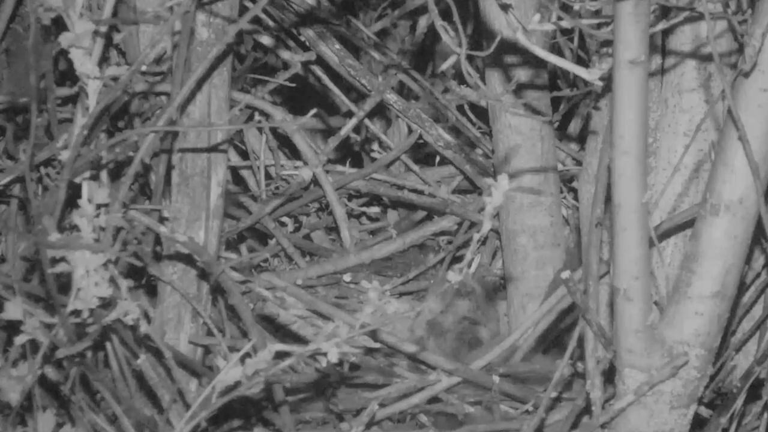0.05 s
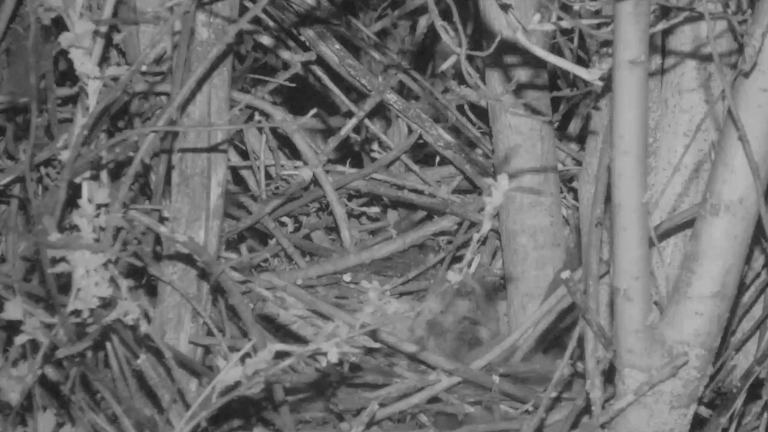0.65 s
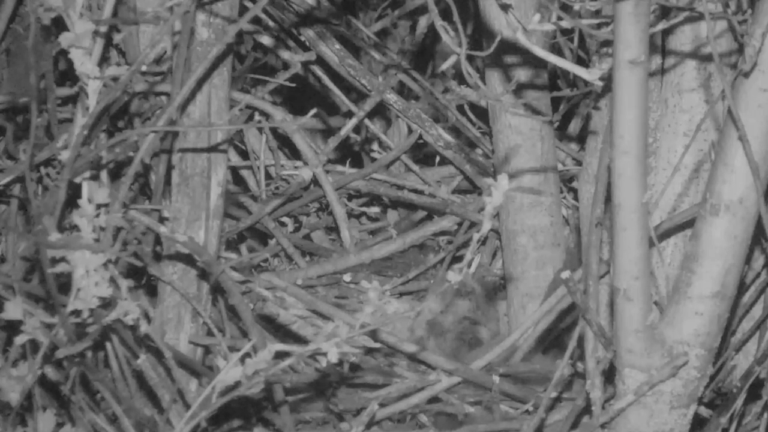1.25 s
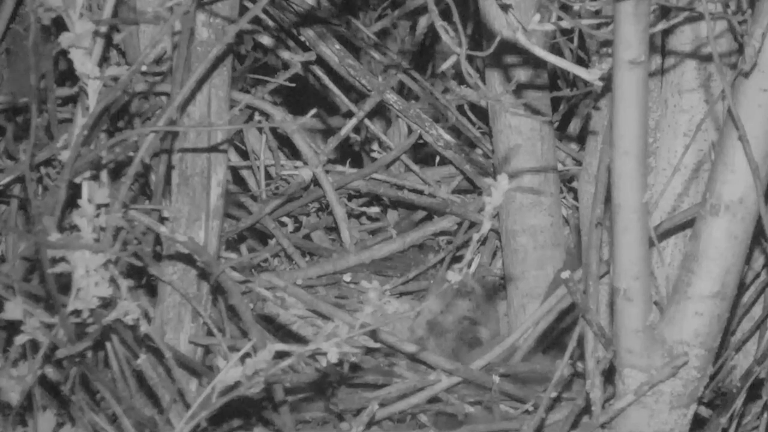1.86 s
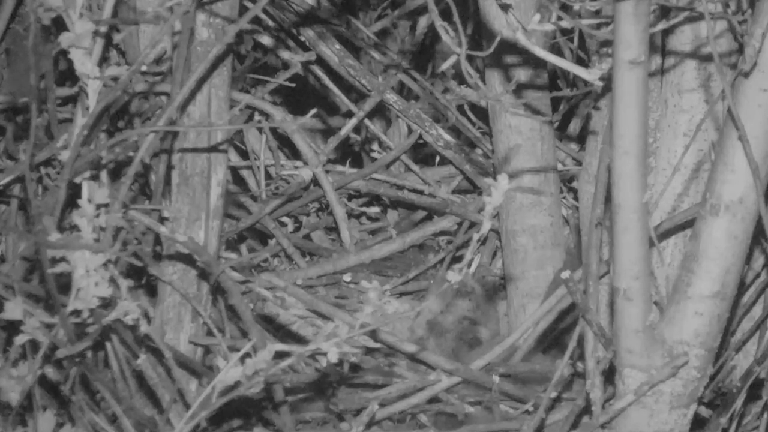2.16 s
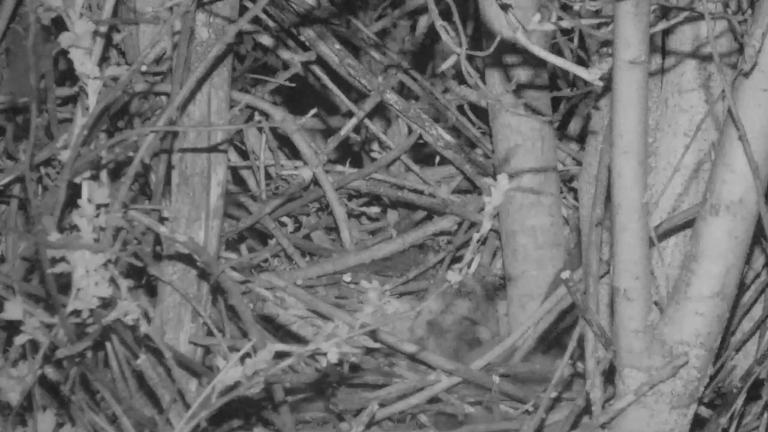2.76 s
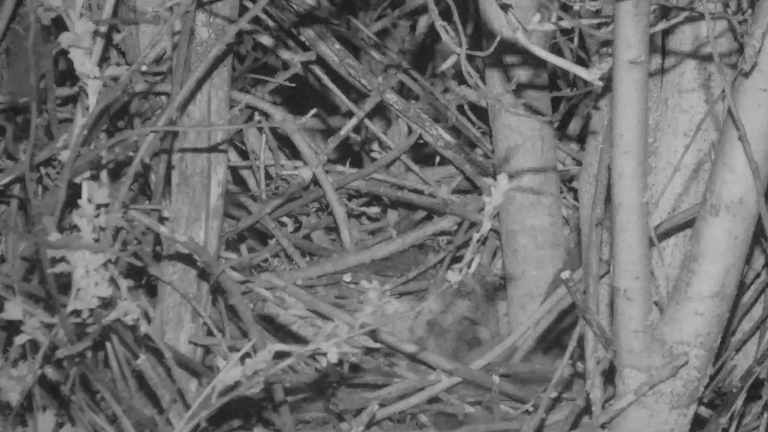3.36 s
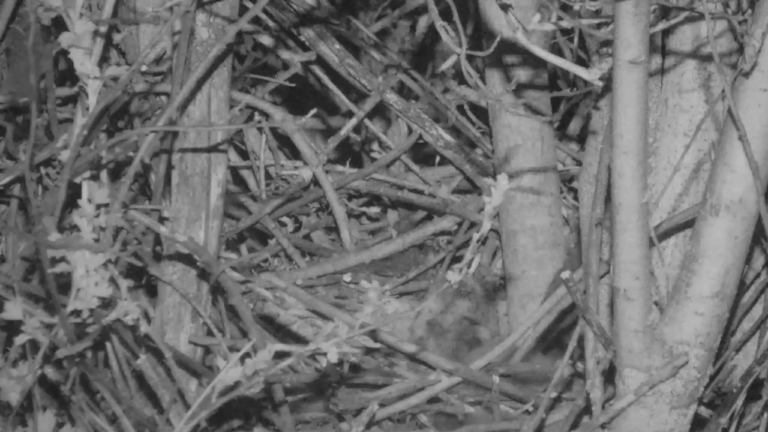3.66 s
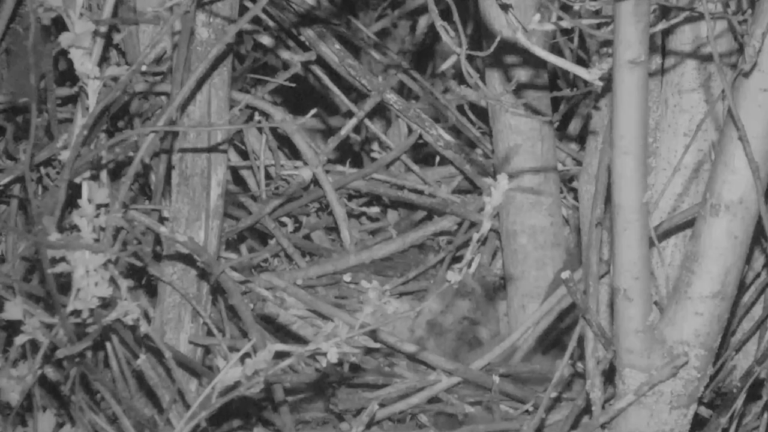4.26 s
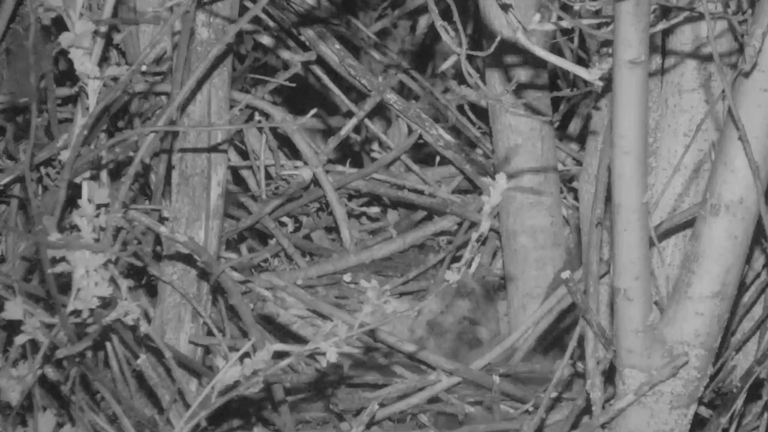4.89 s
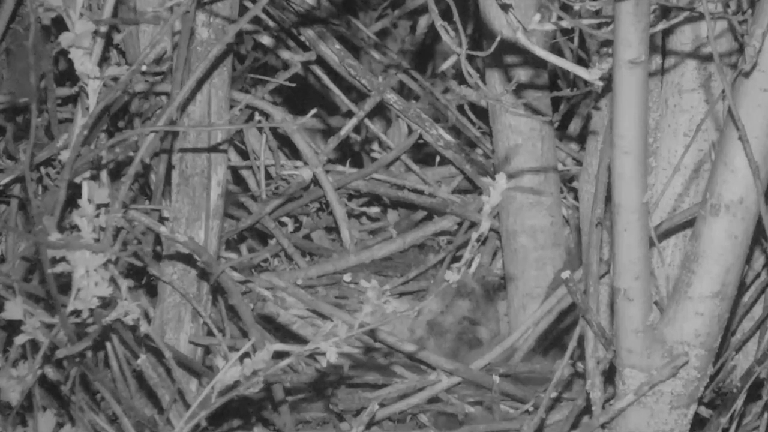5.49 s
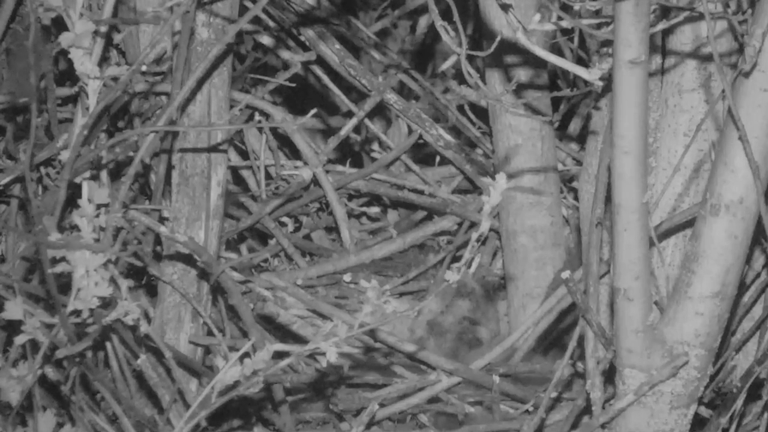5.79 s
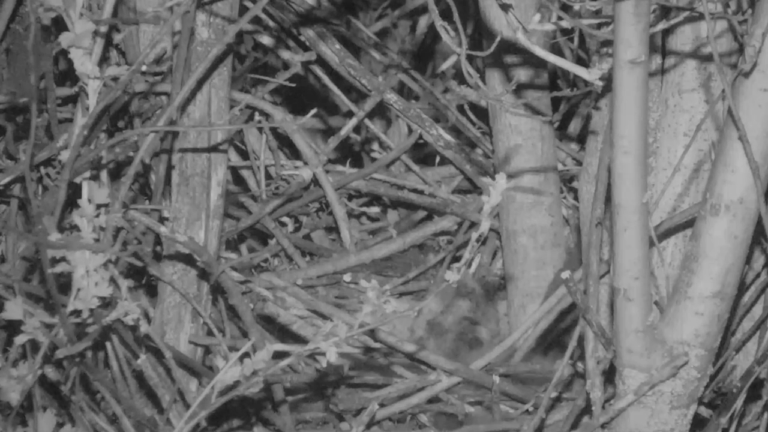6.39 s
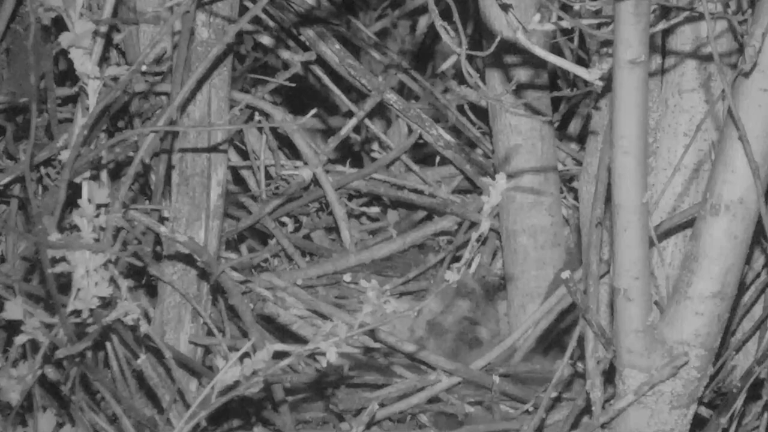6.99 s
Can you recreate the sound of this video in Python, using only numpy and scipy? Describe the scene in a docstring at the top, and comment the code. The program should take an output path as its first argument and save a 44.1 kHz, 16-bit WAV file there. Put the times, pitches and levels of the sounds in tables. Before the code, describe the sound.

An owl squeals in thin, wavering wails at its nest, with rustling, snapping twigs and soft thumps over faint hiss and hum.

```python
"""Owl at the nest by night

An owl squeals in thin, wavering wails, a harmonic tone that sometimes breaks into a low cluck.
Feathers and feet rustle in the sticks by friction, twigs and the owl's bill snap sharply, and the nest
thumps under the bird's weight. Nearby trunks reflect the calls and snaps. The microphone beside
the nest favours 2-4 kHz and carries a faint hiss and electrical hum."""
import sys
import numpy as np
from scipy import signal
from scipy.fft import rfft, irfft
from scipy.io import wavfile

SR = 44100
rng = np.random.default_rng(int(sys.argv[2]) if len(sys.argv) > 2 else 0)


def waveform_to_disk(signal):
    """Save audio, clipped to [-1, 1], as 16-bit WAV at the path in sys.argv[1]."""
    frames = np.transpose(np.atleast_2d(signal))
    scaled = np.clip(frames, -1, 1) * 32767
    samples = np.round(scaled).astype(np.int16)
    wavfile.write(sys.argv[1], SR, samples)


N = 314874
TIME = np.arange(N) / SR
CUTOFF_HZ = 14350

# crests and troughs of pitch, one table per squeal: t/s, f/Hz, effort/dB
SQUEAL_TURNS = [
    [(0.0, 1550, -31), (0.041, 1567, -29), (0.073, 1510, -35.5), (0.128, 1607, -27.5), (0.249, 1507, -34),
     (0.294, 1569, -28.5), (0.331, 1300, -39), (0.378, 1614, -24.5), (0.402, 1425, -36), (0.462, 1693, -24),
     (0.495, 1573, -26.5), (0.524, 1771, -28), (0.556, 1690, -24.5)],
    [(0.798, 1548, -27), (0.899, 1492, -30.5), (0.968, 1574, -29.5), (1.012, 1496, -28.5),
     (1.059, 1573, -28.5), (1.129, 1563, -30), (1.162, 1602, -28.5), (1.22, 1482, -32), (1.264, 1560, -28),
     (1.296, 1610, -32), (1.331, 1855, -27), (1.38, 1364, -23)],
    [(1.662, 2024, -33), (1.682, 2145, -30), (1.744, 2026, -29), (1.757, 1766, -28), (1.778, 2052, -21.5),
     (1.829, 1494, -24), (1.844, 1628, -25), (1.859, 2212, -14), (1.871, 1740, -25), (1.884, 2006, -18),
     (1.903, 1588, -25), (1.922, 1735, -21), (1.94, 1477, -25), (1.972, 1623, -22.5), (1.981, 2114, -20.5),
     (2.027, 1627, -22), (2.074, 2166, -21), (2.087, 1930, -25.5), (2.109, 1985, -24), (2.136, 2428, -24.5),
     (2.183, 1425, -22), (2.201, 2464, -20), (2.227, 2655, -18.5), (2.261, 1657, -22.5), (2.271, 1834, -22),
     (2.288, 1640, -30)],
    [(2.52, 1993, -24.5), (2.536, 2083, -19.5), (2.601, 1848, -25.5), (2.652, 1631, -29),
     (2.675, 1680, -26), (2.726, 1601, -27.5), (2.812, 1921, -28), (2.827, 1739, -23), (2.848, 1788, -26),
     (2.864, 1555, -24.5), (2.881, 1756, -28), (2.895, 1620, -28), (2.927, 1680, -29.5)],
    [(2.96, 1626, -28.5), (2.975, 2060, -24.5), (3.02, 1604, -24.5), (3.039, 1990, -24),
     (3.061, 1644, -23.5), (3.081, 1643, -30), (3.117, 2052, -21), (3.154, 1750, -22.5)],
    [(3.423, 1962, -25.5), (3.445, 2138, -27.5), (3.532, 1965, -28), (3.552, 1926, -25), (3.571, 1643, -30),
     (3.645, 1677, -27.5), (3.665, 1620, -33), (3.788, 1669, -29), (3.798, 1582, -27.5), (3.858, 1599, -36),
     (3.88, 1751, -21), (3.891, 1600, -28.5), (3.944, 1632, -29.5), (3.97, 1810, -26.5), (3.991, 1598, -24),
     (4.008, 1580, -27.5), (4.032, 1903, -24.5), (4.074, 1236, -27.5)],
    [(4.093, 1765, -30), (4.101, 1743, -26.5), (4.119, 1820, -46)],
    [(4.335, 1893, -28.5), (4.361, 2190, -28), (4.389, 2115, -32.5), (4.418, 2187, -27.5),
     (4.459, 2070, -32), (4.499, 1640, -30), (4.514, 1715, -27.5), (4.536, 1603, -35), (4.581, 1792, -29.5),
     (4.597, 1586, -36), (4.608, 1680, -33), (4.653, 1662, -35), (4.693, 1658, -35.5)],
    [(4.744, 1787, -40), (4.751, 1882, -35), (4.794, 1563, -34), (4.818, 1746, -37), (4.832, 1590, -50),
     (4.846, 1705, -34), (4.871, 1660, -50)],
    [(4.906, 1654, -43), (4.925, 1730, -38.5), (4.934, 1640, -54)],
]
# timbre of each squeal: octave/dB, roughness (0-1) at start, at end, third partial/dB, higher ones/dB
SQUEAL_TIMBRES = [(4.5, 0.07, 0.55, -12, 1), (-0.5, 0.04, 0.4, -17.5, -1), (-0.5, 0.28, .55, -6.5, -3),
                  (-2, 0.14, 0.79, -6, -13), (2, 0.58, 0.028, -4.5, -8.5), (-3.5, 0.13, 0.36, -1, -9),
                  (-1, 0.4, 0.22, -4, -9), (0, 0, 0.72, 0.5, -8), (2, 0.6, .3, 0, -11),
                  (4.5, .3, .3, -8, -9)]
# weighting of the fundamental and the octave: f/Hz, gain/dB
VOICE_RESPONSE = [(1250, -7), (1530, -9.5), (1650, -3), (1800, -0.5), (2150, -1), (2700, 1), (2850, -6),
                  (3000, 0.5), (3120, -1.5), (3300, -2), (3600, 5), (4100, 0), (4400, -8.5), (4850, -13),
                  (5100, -33), (5400, -32)]
# weighting of the higher partials, relative to those two: f/Hz, gain/dB
OVERTONE_RESPONSE = [(3700, 4), (4700, -16), (5500, -31), (6300, -31.5), (7000, -42), (7900, -36),
                     (9500, -47), (11000, -51), (13000, -59)]
# reflections from trunks: delay/s, gain/dB
TRUNK_ECHOES = [(.0031, -37), (.0074, -13), (0.0135, -22.5), (.019, -20)]
# light fidgeting between stirs: t/s, level/dB
FIDGETING = [(0, -58), (2.4, -51), (3.4, -56), (4.7, -55), (5, -72), (6.1, -52), (6.5, -73.5), (7.1, -46)]
# the bird stirs: t/s, rise/s, fall/s, stick level/dB, feather level/dB
STIRS = [(.05, 0.17, 0.067, -48, -63), (.31, 0.13, 0.069, -47, -63), (.4, 0.013, 0.091, -44.5, -58),
         (.52, 0.042, 0.3, -47, -61), (.86, 0.13, 0.097, -48.5, -61.5), (1.418, 0.077, .03, -41.5, -75),
         (1.58, 0.081, 0.12, -43, -60), (1.83, 0.03, 0.045, -30.5, -43.5), (2.07, 0.22, 0.092, -37, -50),
         (2.31, 0.05, 0.046, -36.5, -56.5), (2.647, 0.1, 0.084, -39, -51.5),
         (2.84, 0.059, 0.074, -40, -56.5), (3.16, 0.049, 0.046, -42, -77), (3.46, .05, 0.028, -39.5, -61),
         (3.78, .025, 0.024, -45, -63), (4.239, 0.063, 0.047, -39, -52), (4.44, 0.15, 0.09, -46.5, -61),
         (4.65, 0.11, 0.017, -44.5, -59.5), (5.15, 0.024, .025, -51.5, -61),
         (5.67, 0.069, 0.27, -52.5, -67), (5.83, 0.015, 0.068, -38.5, -54.5),
         (5.975, 0.043, 0.029, -40, -56.5), (6.05, 0.044, 0.037, -47, -62),
         (7.07, 0.02, 0.22, -42.5, -55.5)]
# spectrum of rubbing sticks: f/Hz, density/dB
STICK_SPECTRUM = [(200, -10.5), (600, -16), (900, -15), (1250, -11), (1600, -9.5), (2300, 1.5), (2750, 0.5),
                  (3400, 4), (3900, 1), (4500, -26.5), (5500, -21.5), (7000, -29), (10000, -58)]
# spectrum of brushing feathers: f/Hz, density/dB
FEATHER_SPECTRUM = [(3000, -5), (4500, 13), (6000, -2.5), (8500, 0.5), (11000, -6), (14300, -8.5)]
# the bird's weight shakes the nest: t/s, rise/s, fall/s, level/dB
LURCHES = [(.9, 0.036, 0.22, -44.5), (1.22, 0.065, 0.099, -40.5), (1.487, 0.033, 0.023, -31),
           (1.66, 0.19, 0.071, -33.5), (1.82, 0.2, 0.16, -44.5), (5.85, .015, 0.044, -43.5),
           (7.12, .04, .06, -57)]
# spectrum of the shaken nest: f/Hz, density/dB
THUMP_SPECTRUM = [(35, -12), (70, -2), (140, 0), (220, -5), (300, -5.5), (400, -5), (600, -20), (850, -7.5),
                  (1100, -44.5), (2000, -59)]
# spectrum of the hiss: f/Hz, density/dB
HISS_SPECTRUM = [(25, -11.5), (50, -8.5), (90, -18.5), (200, -22.5), (420, -20.5), (750, -22.5),
                 (1250, -27.5), (1600, -21.5), (2000, -23.5), (2350, -22), (2800, -18.5), (3300, -26),
                 (3900, -38.5), (6000, -43), (14300, -53.5)]
# lines of electrical hum and whine: f/Hz, relative level/dB
HUM_LINES = [(59, -61), (117.4, -61), (351, -59.5), (585.5, -55.5), (876, -62), (985, -60), (1054, -61.5),
             (1873, -56.5), (1970, -59.5), (2106, -54), (2661, -67), (2810, -54), (2955, -56.5),
             (3159.5, -49), (4213, -68)]
# spectrum of the steady rumble: f/Hz, density/dB
RUMBLE_SPECTRUM = [(20, 2), (55, -5.5), (130, -26), (1000, -50), (9000, -63)]
# sharp snaps of twigs and of the owl's bill:
# t/s, peak level/dB, burst length/s, knock/dB, tilt of the ring/(dB per octave)
SNAPS = [(0.244, -17.5, 0.0023, -24, 19), (.392, -19, 0.0025, -17, 5), (0.505, -13, 0.0026, -9, 6),
         (1.541, -6.5, 0.0017, -27, -7), (1.546, -6.5, 0.0081, -31, -3), (1.56, -18, 0.003, -16, -6),
         (1.595, -10.5, 0.0018, -7, -17), (3.412, -19.5, 0.0064, -7, 6), (3.432, -15.5, 0.007, -15, 17),
         (3.4958, -2, 0.0051, -51, 4), (3.578, -14.5, 0.0073, -24, -11), (3.649, -17, .0069, -14, -15),
         (3.762, -17.5, 0.0017, -8, -14), (3.806, -16.5, 0.0085, -24, -10), (5.8169, -12, 0.0013, -5, -2),
         (5.827, -6, .0035, -23, 7), (5.8516, -7, 0.00095, -8, -4), (5.8908, -10, 0.0014, -16, 3),
         (5.969, -25, 0.0052, -20, -2), (5.973, -16.5, 0.0046, -26, 13), (6.168, -28.5, .0025, -15, 6),
         (6.855, -15.5, 0.0052, -40, 13), (6.973, -24, 0.0084, -9, -2), (6.984, -20.5, 0.0043, -11, 13),
         (7.057, -9.5, 0.00029, -1, 26), (7.071, -23, .01, -7, -2)]
# bright ring of a snap: f/Hz, level/dB, T60/s
BRIGHT_MODES = [(2290, 4.5, 0.0051), (2420, 3, 0.0086), (2900, -1.5, 0.011), (3356, 2, 0.01),
                (3730, -0.5, 0.0052)]
# its lower knock: f/Hz, level/dB, T60/s
KNOCK_MODES = [(239, -18, 0.015), (720, -17, 0.0072), (1100, -34, 0.0012), (1590, -2.5, 0.0058)]
# ticks of bark and leaves: t/s, relative level/dB
BARK_TICKS = [(.335, -36), (.394, -34), (.951, -35), (1.953, -28), (2.108, -26), (2.328, -27), (3.497, -36),
              (3.913, -44), (5.156, -45)]
# breaks into the low register: t/s, hold/s, f/Hz, level/dB, initial pitch drop/octaves
CLUCKS = [(0.577, .004, 463.5, -28.5, 1.3), (1.441, 0.03, 480.3, -24.5, 0), (2.325, .003, 400, -46.5, 1.4),
          (3.168, 0.0037, 394, -41.5, 1.4)]
# resonances of the throat in that register: f/Hz, gain/dB
THROAT_RESPONSE = [(150, 19), (480, -1.5), (970, -10), (1450, -13.5), (1900, -12), (2400, -0.5),
                   (2900, -10), (3400, -9), (4200, -17.5), (6000, -43)]


def from_db(db):
    """Amplitude ratio: a factor of ten per 20 dB."""
    return 10 ** (np.asarray(db) / 20)


def unit_rms(x):
    """Normalisation to unit mean power."""
    return x / np.sqrt(np.mean(x ** 2) + 1e-20)


def in_time(rows, t=TIME):
    """Linear interpolation of each column at times t."""
    times, *columns = np.transpose(rows)
    return [np.interp(t, times, column) for column in columns]


def gain_at(spectrum, hz):
    """Frequency response, interpolated in decibels on a logarithmic frequency axis."""
    points, db = np.transpose(spectrum)
    return from_db(np.interp(np.log(hz + 1e-9), np.log(points), db))


def coloured(noise, spectrum):
    """Spectral shaping to unit rms, with a 12 dB per octave roll-off below the lowest point."""
    hz = np.arange(N // 2 + 1) * SR / N
    roll_off = np.minimum(hz / spectrum[0][0], 1) ** 2
    return unit_rms(irfft(rfft(noise) * gain_at(spectrum, hz) * roll_off, N))


def drift(rate_hz, size=N):
    """Random modulation: low-passed noise of unit rms."""
    lowpass = signal.butter(2, rate_hz, fs=SR, output="sos")
    return unit_rms(signal.sosfilt(lowpass, rng.standard_normal(size + SR // 10))[-size:])


def call_window(start, end, fade_s):
    """Raised-cosine gating: the samples of a call, their times and the gate."""
    at = np.flatnonzero((TIME > start - fade_s / 2) & (TIME < end + fade_s / 2))
    t = TIME[at]
    to_edge_s = np.minimum(t - t[0], t[-1] - t)
    return at, t, np.sin(np.pi / 2 * np.clip(to_edge_s / fade_s, 0, 1)) ** 2


def swell(peak_s, rise_s, fall_s):
    """Asymmetric Gaussian envelope of unit height."""
    width_s = np.where(TIME < peak_s, rise_s, fall_s)
    return np.exp(-np.minimum(((TIME - peak_s) / width_s) ** 2, 50))


def glide(turns, t, crest_breadth=1.3):
    """Frequency contour that lingers on crests and darts through troughs; both ends are in mid-glide."""
    times, hz, _ = np.transpose(sorted(turns))
    position = np.interp(t, times, np.arange(len(times)))
    leg = np.minimum(position.astype(int), len(times) - 2)
    x, step_hz = position - leg, np.diff(hz)[leg]
    arched = np.where(step_hz < 0, x ** crest_breadth, 1 - (1 - x) ** crest_breadth)
    opening, closing = np.sin(np.pi / 2 * x), 1 - np.cos(np.pi / 2 * x)
    eased = np.select([leg == 0, leg == len(times) - 2], [opening, closing], np.sin(np.pi / 2 * arched) ** 2)
    return hz[leg] + eased * step_hz


def squeals(jitter=0.029, waver=0.00725, shimmer_db=2.5, catch_db=17, flutter_db=3, high_flutter_db=3.5):
    """A whistling membrane radiates harmonics with a strong octave; strain modulates pitch and level."""
    out = np.zeros(N)
    for turns, timbre in zip(SQUEAL_TURNS, SQUEAL_TIMBRES):
        octave_db, rough_start, rough_end, third_db, high_db = timbre
        at, t, gate = call_window(turns[0][0], turns[-1][0], fade_s=0.005)
        size = len(t)
        pitch, effort = glide(turns, t), from_db(in_time(turns, t)[1])
        fundamental = effort * gain_at(VOICE_RESPONSE, pitch)
        octave = effort * from_db(octave_db) * gain_at(VOICE_RESPONSE, 2 * pitch)
        # fast glides roughen the voice and weaken its octave
        octaves_per_s = np.abs(np.gradient(np.log2(pitch), t))
        roughness = np.clip(np.linspace(rough_start, rough_end, size) + 0.0069 * octaves_per_s, 0, 1)
        pitch = pitch * (1 + jitter * roughness * drift(320, size) + waver * drift(50.7, size))
        phase = 2 * np.pi * np.cumsum(pitch) / SR
        flutter = from_db(flutter_db * drift(55, size) - 0.01 * octaves_per_s)
        tone = fundamental * np.sin(phase) + octave * flutter * np.sin(2 * phase)
        third_db = third_db + 10.5 * (roughness - 0.3)   # strain brings out the third partial
        for k in range(3, 9):
            partial_db = (third_db if k == 3 else high_db) + high_flutter_db * drift(40, size)
            response = gain_at(OVERTONE_RESPONSE, k * pitch) * (k * pitch < CUTOFF_HZ)
            tone += np.hypot(fundamental, octave) * from_db(partial_db) * response * np.sin(k * phase)
        catch = np.maximum(drift(43, size) - 0.5, 0)   # a rough voice breaks off briefly
        unsteady_db = roughness * (shimmer_db * drift(150, size) - catch_db * catch)
        out[at] += np.sqrt(2) * tone * gate * from_db(unsteady_db)
    return out


def trees(direct, echo_db, scatter_db=-19, t60_s=0.37, size=16384):
    """Trunks reflect and branches scatter; the delayed copies interfere with the direct sound."""
    t = np.arange(size) / SR
    response = rng.standard_normal(size) * from_db(-60 * t / t60_s) * (t > 0.004)
    response *= from_db(scatter_db) / np.linalg.norm(response)
    for delay_s, db in TRUNK_ECHOES:
        response[round(delay_s * SR)] += from_db(db)
    return direct + from_db(echo_db) * signal.fftconvolve(direct, response)[:N]


def rustle(slips_per_s=3500, clump_db=2, catches_per_s=20, stick_gain_db=9.5, feather_gain_db=7.5):
    """Friction: sticks rub in clumps of tiny slips; feathers brush over them and catch with a tick."""
    stick_level = from_db(in_time(FIDGETING)[0])
    feather_level = stick_level * from_db(-15)
    for peak_s, rise_s, fall_s, stick_db, feather_db in STIRS:
        motion = swell(peak_s, rise_s, fall_s)
        stick_level = np.hypot(stick_level, from_db(stick_db) * motion)   # incoherent powers add
        feather_level = np.hypot(feather_level, from_db(feather_db) * motion)
    slips = (rng.random(N) < slips_per_s / SR) * rng.standard_normal(N) * from_db(clump_db * drift(83))
    catches = (rng.random(N) < catches_per_s / SR) * from_db(11 + 6 * rng.random(N))
    brush = rng.standard_normal(N) * from_db(drift(60)) + catches
    crackle = stick_level * from_db(stick_gain_db) * coloured(slips, STICK_SPECTRUM)
    swish = feather_level * from_db(feather_gain_db) * coloured(brush, FEATHER_SPECTRUM)
    return crackle + swish


def thumps(bumps_per_s=1500):
    """Shot noise: soft random impacts of feet and wings rumble through the pile of sticks."""
    shake = from_db(in_time(FIDGETING)[0] - 5)
    for peak_s, rise_s, fall_s, db in LURCHES:
        shake = np.hypot(shake, from_db(db) * swell(peak_s, rise_s, fall_s))
    bumps = (rng.random(N) < bumps_per_s / SR) * rng.choice([-1, 1], N)
    return shake * coloured(bumps, THUMP_SPECTRUM)


def noise_floor(hiss_db=-45.66, hum_gain_db=-2.5, rumble_db=-62):
    """Stationary noise: broadband hiss, a line spectrum of hum, and rumble in antiphase left to right."""
    hiss = from_db(hiss_db) * coloured(rng.standard_normal(N), HISS_SPECTRUM)
    hum = sum(from_db(db + hum_gain_db) * np.sqrt(2) * np.sin(2 * np.pi * (hz * TIME + rng.random()))
              for hz, db in HUM_LINES)
    rumble = from_db(rumble_db) * coloured(rng.standard_normal(N), RUMBLE_SPECTRUM)
    return hiss + hum + rumble * np.array([[1], [-1]])


def ring(force, modes):
    """Modal superposition: a force drives damped resonators, summed in alternating sign."""
    out = 0
    for k, (hz, db, t60_s) in enumerate(modes):
        radius, angle = from_db(-60 / (t60_s * SR)), 2 * np.pi * hz / SR
        feedback = [1, -2 * radius * np.cos(angle), radius ** 2]
        out += (-1) ** k * from_db(db) * signal.lfilter([0, np.sin(angle)], feedback, force + 1e-18)
    return out


def snaps(burst_db=-9, tail_db=-28, tail_s=0.02, crack_db=-26, size=4096):
    """Impulsive excitation: sharp snaps of twigs and of the owl's bill set damped modes ringing."""
    out, t = np.zeros(N + size), np.arange(size) / SR
    highpass = signal.butter(2, 1300, "high", fs=SR, output="sos")   # small bodies radiate little bass
    lowpass = signal.butter(6, 4300, fs=SR, output="sos")
    for start_s, peak_db, burst_s, knock_db, tilt_db in SNAPS:
        burst, tail = rng.standard_normal((2, size))
        force = from_db(burst_db) * burst * np.abs(burst) * (t < burst_s)
        force += from_db(tail_db) * tail * np.exp(-t / tail_s)
        force[0] += 3   # the opening impulse
        # a positive tilt favours the higher modes
        modes = [(hz, db + tilt_db * np.log2(hz / 3000), t60_s) for hz, db, t60_s in BRIGHT_MODES]
        bright = signal.sosfilt(highpass, ring(force, modes))
        knock = 2 * from_db(knock_db) * ring(force, KNOCK_MODES)
        crack = 2 * from_db(crack_db + knock_db / 2) * force
        snap = signal.sosfilt(lowpass, bright + knock) + crack
        start = round(start_s * SR)
        out[start:start + size] += from_db(peak_db) * snap / np.abs(snap).max()
    return out[:N]


def ticks(decay_s=0.0011, gain_db=1, size=512):
    """Tiny cracks in bark and leaves: bright noise transients that decay exponentially."""
    out = np.zeros(N)
    for start_s, db in BARK_TICKS:
        burst = rng.standard_normal(size) * np.exp(-np.arange(size) / SR / decay_s)
        start = round(start_s * SR)
        out[start:start + size] += from_db(db + gain_db) * burst / np.abs(burst).max()
    return signal.sosfilt(signal.butter(2, 2500, "high", fs=SR, output="sos"), out)


def clucks(attack_s=0.028, release_s=0.022, edge_db=-19.5, sag_octaves_per_s=24, jitter=0.044):
    """Source and filter: the throat colours slow, uneven voice pulses whose pitch sags as they die."""
    out = np.zeros(N)
    for onset_s, hold_s, hz, db, drop_octaves in CLUCKS:
        at, t, gate = call_window(onset_s - attack_s, onset_s + hold_s + release_s, fade_s=0.006)
        before, after = np.maximum(onset_s - t, 0), np.maximum(t - onset_s - hold_s, 0)
        pitch = hz * 2 ** (drop_octaves * before / attack_s - sag_octaves_per_s * after)
        level_db = db + edge_db * (before / attack_s + after / release_s)
        phase = 2 * np.pi * np.cumsum(pitch * (1 + jitter * drift(270, len(t)))) / SR
        tone = sum(gain_at(THROAT_RESPONSE, k * pitch) * np.sin(k * phase) for k in range(1, 17))
        out[at] += np.sqrt(2) * tone * gate * from_db(level_db)
    return out


def scene():
    """Superposition of bird and nest at one microphone; echoes beat against the gliding voice."""
    bird = trees(squeals(), echo_db=1) + trees(clucks(), echo_db=-3)
    nest = trees(snaps(), echo_db=1) + ticks() + rustle() + thumps()
    return bird + nest + noise_floor()


def record(dry):
    """Band limiting: clipping at full scale, a steep low-pass and a DC offset, mainly on the left."""
    lowpass = signal.ellip(12, 0.1, 80, CUTOFF_HZ, fs=SR, output="sos")
    dc_offset = np.array([[0.033], [0.001]])
    return signal.sosfilt(lowpass, np.clip(dry, -1, 1)) + dc_offset


dry = scene()
out = record(dry)
waveform_to_disk(out)
```